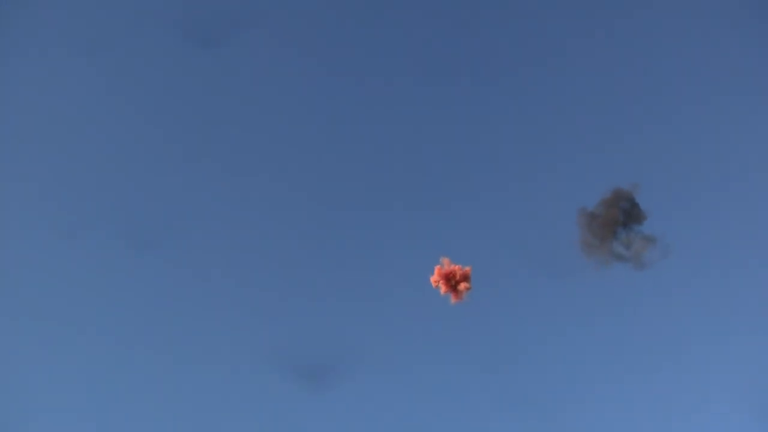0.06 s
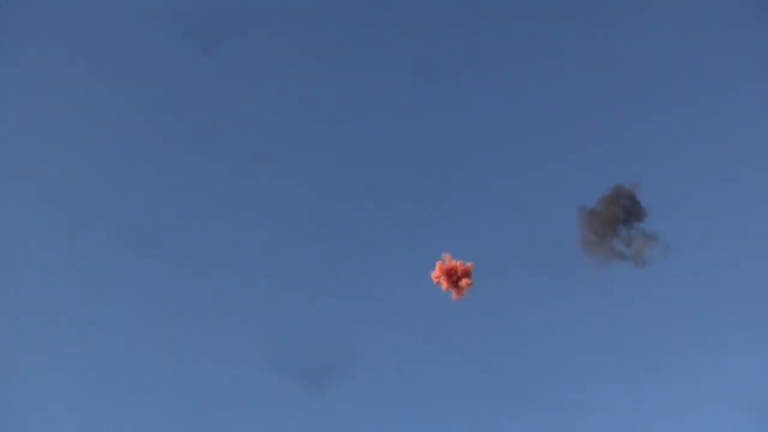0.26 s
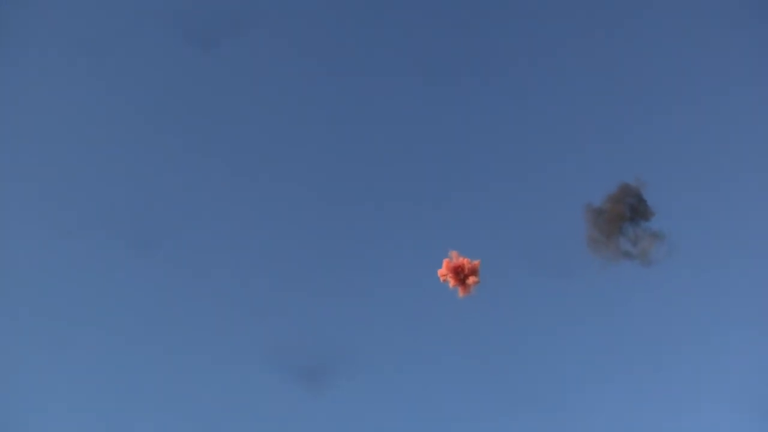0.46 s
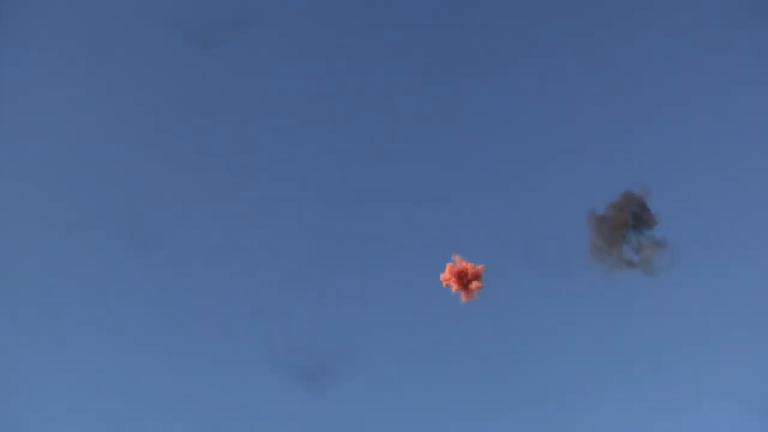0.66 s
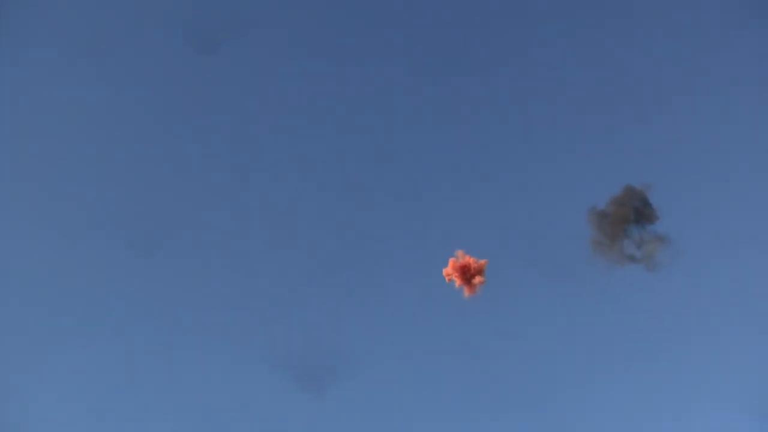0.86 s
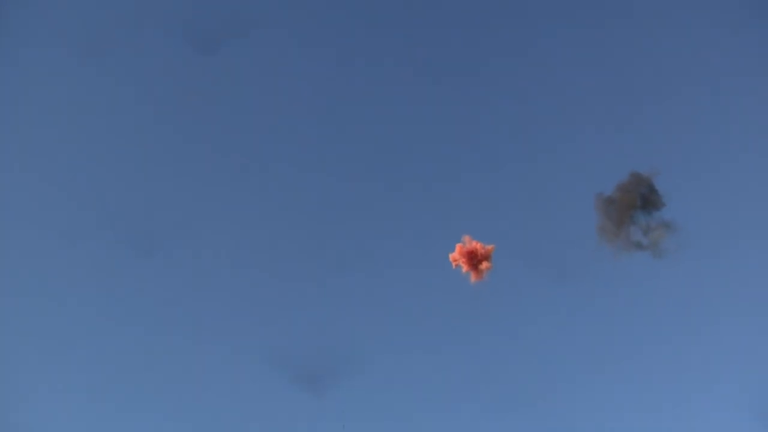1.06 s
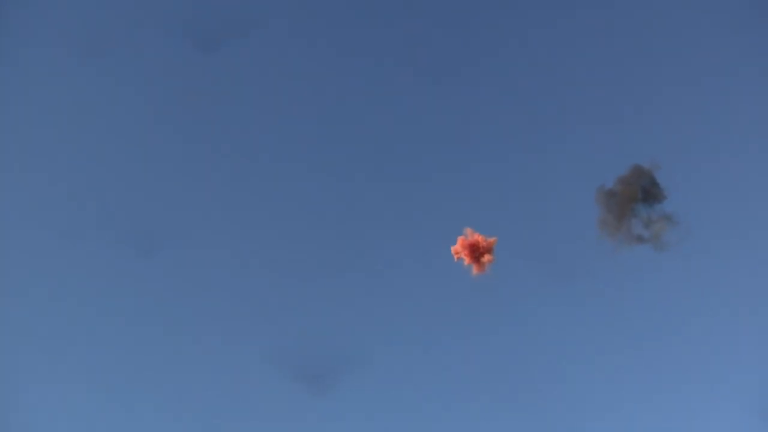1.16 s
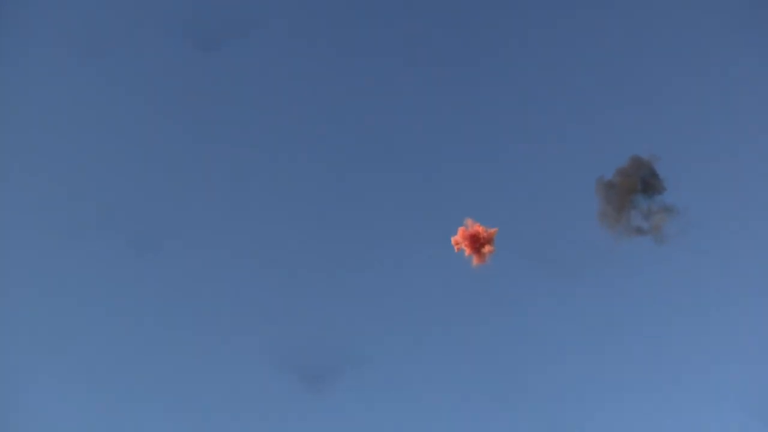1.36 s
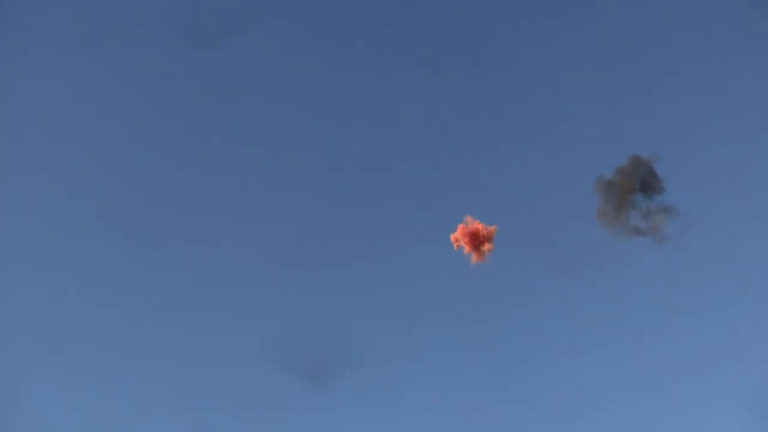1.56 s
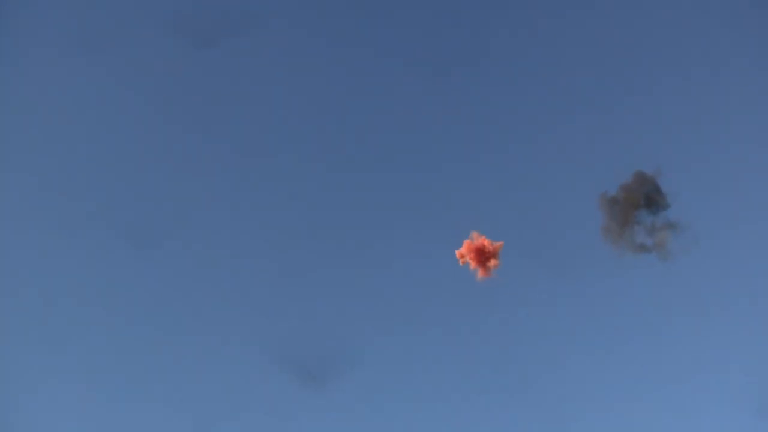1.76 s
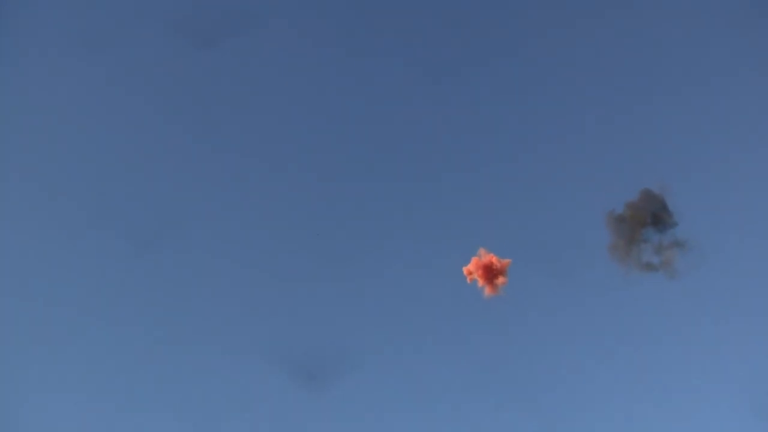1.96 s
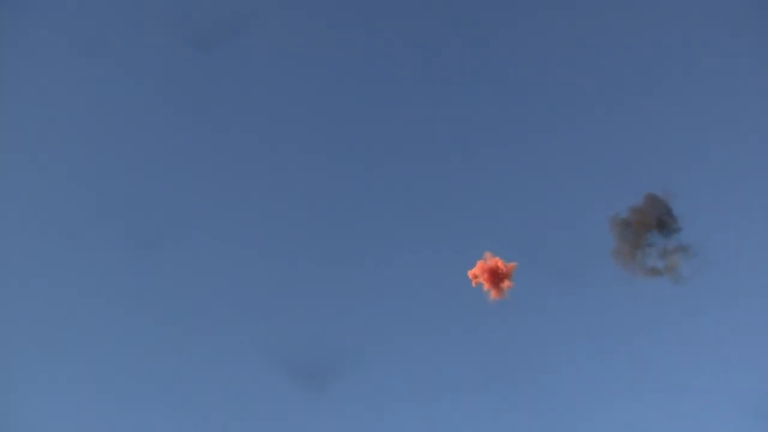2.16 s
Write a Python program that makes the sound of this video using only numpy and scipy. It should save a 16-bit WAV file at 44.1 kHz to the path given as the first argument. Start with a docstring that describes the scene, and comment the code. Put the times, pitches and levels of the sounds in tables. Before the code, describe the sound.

A firework shell bangs sharply overhead outdoors, its ragged echoes fading into a low rolling rumble

```python
"""Aerial shell burst with echoes

A firework shell bursts overhead: swarms of random fronts, sharp shocks, ringing cracks and a falling thump.
Its ragged bang returns in echoes from the ground and buildings, over a scattered tail and a low boom.
Fainter cracks and dull thuds of farther shells roll over a grainy rumble of filtered noise from the left.
Two tiny sine ticks and a faint hiss lie on top. Two close microphone ports make the stereo.
"""
import sys
import numpy as np
from scipy import signal
from scipy.fft import rfft, irfft, next_fast_len
from scipy.io import wavfile
from scipy.ndimage import uniform_filter1d

SR = 44100
rng = np.random.default_rng(int(sys.argv[2]) if len(sys.argv) > 2 else 0)


def gain_from_db(level_db):
    """Convert decibel levels to linear amplitude factors (20 dB per decade)."""
    decades = np.asarray(level_db, float) / 20
    return 10 ** decades


def unload_audio(sound):
    """Save the sound as a 16-bit wav file, at the path given as the first command line argument."""
    columns = np.transpose(np.atleast_2d(sound))
    # keep every value between -1 and 1, then stretch to whole-number steps
    steps = np.round(np.clip(columns, -1, 1) * 32767)
    wavfile.write(sys.argv[1], SR, steps.astype(np.int16))


N = 97020
T = np.arange(N) / SR


def level(x, db):
    """Scale to an rms level."""
    return x * gain_from_db(db) / np.sqrt(np.mean(x ** 2))


def colour(x, table, lag_s=0.):
    """Causal minimum-phase filter through (f/Hz, level/dB) points, with a small delay."""
    size = next_fast_len(N + 8192)
    f = np.arange(size // 2 + 1) * SR / size
    hz, db = np.array(table, float).T
    log_gain = np.interp(np.log(f + 1), np.log(hz), db) * np.log(10) / 20
    # folding the cepstrum onto positive time makes the response causal
    cepstrum = irfft(log_gain, size)
    cepstrum[1:size // 2] *= 2
    cepstrum[size // 2 + 1:] = 0
    response = np.exp(rfft(cepstrum) - 2j * np.pi * f * lag_s)
    return irfft(rfft(x, size) * response, size)[..., :N]


def dull(x, hz):
    """Second-order low-pass that takes the edge off."""
    return signal.lfilter(*signal.butter(2, hz, fs=SR), x)


def grains(rate, scatter_db):
    """Random small fronts of uneven size, rate per second."""
    hit = rng.random(N) < rate / SR
    return hit * rng.standard_normal(N) * gain_from_db(scatter_db * rng.random(N))


def fronts(table, smooth, damp):
    """Pressure jumps up, falls through zero and rings out; smooth is the onset's share of a cycle."""
    out = np.zeros(N)
    for start_s, db, cycle_ms in table:
        u = np.clip((T - start_s) / (cycle_ms / 1000), 0, 20)
        out += gain_from_db(db) * np.tanh(u / smooth) * np.cos(2 * np.pi * u) * np.exp(-damp * u ** 2)
    return out


def walk(rate):
    """Random levels held 1 / rate s and slewed twice."""
    hold = int(SR / rate)
    steps = np.repeat(rng.standard_normal(200), hold)
    return uniform_filter1d(uniform_filter1d(steps, hold), hold)[:N]


def surge(x):
    """Each low band swells and sinks on its own; the sound above them stays steady."""
    # upper edges of the swelling bands (f/Hz)
    band_edges = (113, 211, 302, 382, 550, 774)
    swells_per_s, swell_db = 8.82, 4  # dB per unit of the random walk
    lows = [0] + [dull(x, hz) for hz in band_edges]
    out = x - lows[-1]
    for below, above in zip(lows, lows[1:]):
        out = out + gain_from_db(swell_db * walk(swells_per_s)) * (above - below)
    return out


def rumble():
    """Countless far echoes: dull grains over a smooth wash from the left, and a diffuse part in each port."""
    # how the rumble rolls (t/s, level/dB)
    roll_points = [(0, -47), (.15, -43.5), (.43, -43), (.62, -40.5), (.76, -45), (.87, -42.5), (1.01, -47),
                   (1.23, -47), (1.55, -45), (1.62, -48), (1.901, -46), (2.07, -48), (2.14, -50)]
    # spectrum of the rumble (f/Hz, level/dB)
    rumble_tone = [(15, -49), (28, -17), (80, -3.5), (118, -12.5), (170, -1), (215, -7), (330, -5),
                   (430, -4.5), (620, -7.5), (900, -10), (1500, -16), (2500, -23.5), (4000, -37),
                   (7000, -53.5), (12000, -62)]
    grains_per_s, scatter_db, grains_below_hz = 900, 9, 680
    wash_db, diffuse_db = -4, -7
    s, db = np.array(roll_points).T
    roll = gain_from_db(np.interp(T, s, db))
    lumps = dull(level(grains(grains_per_s, scatter_db), 0), grains_below_hz)
    smooth_wash = gain_from_db(wash_db) * rng.standard_normal(N)
    left = level(colour(surge(lumps + smooth_wash), rumble_tone), 0)
    diffuse = level(colour(rng.standard_normal((2, N)), rumble_tone), diffuse_db)
    return roll * left, roll * diffuse


def hiss():
    """Faint white noise, independent in each port."""
    return gain_from_db(-80) * rng.standard_normal((2, N))


def decay(after, db, t60_s):
    """Exponential fade that starts at its full level when after passes zero."""
    return (after > 0) * gain_from_db(db - 60 * np.abs(after) / t60_s)


def bursts():
    """Swarms of fronts swell, peak and die; a scattered tail and a low boom follow the bang."""
    # the bang, its echoes and far cracks (peak t/s, level/dB, rise/ms, fall time constant/ms, treble/dB)
    swells = [(0.255, -10, 20.7, 6.2, -7.5), (.283, -15.5, 21.6, 16.4, -7), (.325, -28.5, 64, 25, -7),
              (0.355, -28, 59, 17.5, -1), (0.382, -47.5, 56, 7.4, 10.5), (.447, -47.5, 17, 15, 8.5),
              (0.467, -34, 22, 38.6, -4), (.6, -48, 34, 12, -8), (.655, -53.5, 10, 13, 4),
              (.87, -56, 10, 180, -7), (1.049, -47, 29, 31, -7.5), (1.1, -50, 56, 92, -9.5),
              (1.201, -52, 31, 24, -7.5), (1.263, -36.5, 22.5, 6.3, -7.5), (1.283, -44.5, 11, 13, -12),
              (1.314, -41, 18, 21.4, -13.5), (1.423, -48.5, 75, 18, -14), (1.466, -49.5, 14, 12, -16),
              (1.487, -52.5, 20, 11, -11.5), (.004, -48.5, 11, 32, -8.5)]
    # spectrum of the swarm (f/Hz, level/dB)
    swarm_tone = [(90, -12), (150, -5.5), (300, -8.5), (550, -5.5), (900, -5.5), (1450, -6.5), (2200, -7),
                  (3200, -9), (5000, -11.5), (8000, -19.5), (10500, -28.5), (13000, -39.5), (16000, -48.5)]
    grains_per_s, scatter_db, treble_from_hz = 11000, 4, 2500
    tail_db, tail_t60_s, tail_treble_db = -40, 1.09, 2.5
    boom_db, boom_t60_s, boom_hz = -28, 0.2, 140

    pair = np.array([grains(grains_per_s, scatter_db) for _ in range(2)])
    swarm = level(colour(pair, swarm_tone), 0)
    low = dull(swarm, treble_from_hz)
    after = T - swells[0][0]  # time since the bang's peak
    tail = decay(after, tail_db, tail_t60_s)
    # body and treble follow separate power envelopes
    power = tail ** 2
    treble_power = (tail * gain_from_db(tail_treble_db)) ** 2
    for peak_s, db, rise_ms, fall_ms, treble_db in swells:
        d = (T - peak_s) * 1000
        rise = np.cos(np.pi / 2 * np.clip(d / rise_ms, -1, 0)) ** 2
        shape = np.where(d < 0, rise, np.exp(-np.abs(d) / fall_ms))
        power += (gain_from_db(db) * shape) ** 2
        treble_power += (gain_from_db(db + treble_db) * shape) ** 2
    low_noise = dull(dull(rng.standard_normal((2, N)), boom_hz), boom_hz)
    boom = level(low_noise, 0) * decay(after, boom_db, boom_t60_s)
    return np.sqrt(power) * low + np.sqrt(treble_power) * (swarm - low) + boom


def cracks():
    """A few cycles that swell to the peak and die as fast."""
    # ringing cracks (peak t/s, level/dB, f/Hz, ring/ms)
    rings = [(.1539, -36, 1000, .7), (.2496, -12, 1450, 1.6), (.2555, -8, 1400, 2.2),
             (1.2558, -39, 900, 1.5), (1.2606, -31, 960, 1.0), (1.3153, -30.5, 1300, .75)]
    out = np.zeros(N)
    for peak_s, db, hz, ms in rings:
        d = T - peak_s
        out += gain_from_db(db) * np.cos(2 * np.pi * hz * d) * np.exp(-(d * 1000 / ms) ** 2)
    return out


def thuds():
    """Dull pressure fronts from the left that ring out slowly."""
    # thuds of farther shells (start t/s, level/dB, cycle/ms)
    thud_hits = [(.458, -33.5, 10), (.529, -33.5, 14), (.545, -31.5, 14), (.559, -37, 9.5),
                 (.577, -25.5, 3.3), (1.187, -30.5, 3.6), (1.224, -29.5, 3.4), (1.333, -29.5, 3.6),
                 (1.345, -37.5, 4.4), (1.398, -32, 2.8), (1.405, -32, 2.7), (1.565, -41, 3.1),
                 (1.684, -45, 1.3), (1.697, -33.5, 2), (1.855, -33, 2.66), (1.877, -35.5, 3.9),
                 (1.905, -35.5, 4.9), (1.933, -34.5, 4.1), (1.955, -38.5, 3.5), (2.032, -37.5, 3.3),
                 (.208, -30.5, 2.6)]
    return fronts(thud_hits, smooth=0.15, damp=0.69)


def shocks():
    """Single shock fronts overhead, damped within about a cycle."""
    # shock fronts (start t/s, level/dB, cycle/ms)
    shock_hits = [(.2354, -24, 1.8), (.2473, -9, .8), (.2586, -11, 1.0), (1.2605, -30, .5),
                  (.2536, 1.5, 2.1), (.2554, -8, 1.6)]
    return fronts(shock_hits, smooth=.15, damp=1.8)


def thump():
    """The burst's pressure thump: a decaying low sine that falls in pitch."""
    start_s, start_db, t60_s = .252, -8.5, 0.075
    start_hz, end_hz, glide_s = 205, 50, 0.0073
    u = np.maximum(T - start_s, 0)
    hz = end_hz + (start_hz - end_hz) * np.exp(-u / glide_s)
    phase = 2 * np.pi * np.cumsum(hz * (u > 0)) / SR
    return gain_from_db(start_db - 60 * u / t60_s) * np.sin(phase)


def ticks():
    """Tiny bright sine pips that die in a fraction of a millisecond."""
    # faint high ticks (start t/s, level/dB)
    pips = [(1.752, -51), (1.84, -51)]
    tick_hz, fall_s = 8240, 0.00018
    out = np.zeros(N)
    for start_s, db in pips:
        u = np.maximum(T - start_s, 0)
        out += gain_from_db(db) * np.sin(2 * np.pi * tick_hz * u) * np.exp(-u / fall_s)
    return out


def scene():
    """Overhead sound reaches the left port a little first; sound from the left is shadowed on the right."""
    # part of the overhead swarm that differs between the ports (f/Hz, level/dB)
    unlike = [(100, 0), (500, -23), (2000, -32), (6000, -15), (13000, 1)]
    # shadow on the right port for sound from the left (f/Hz, level/dB)
    shadow = [(40, 0), (110, -1), (200, -6), (400, -7), (800, -8.5), (2400, -10), (6000, -8)]
    right_db, above_lag_s, left_lag_s = -.5, 4e-5, 3e-5
    far_left, diffuse = rumble()
    swarm, other_swarm = bursts()
    above = swarm + cracks() + shocks() + thump() + ticks()
    from_left = far_left + thuds()
    above_right = above + colour(other_swarm, unlike)
    right = colour(above_right, [(20, right_db), (20000, right_db)], above_lag_s)
    right = right + colour(from_left, shadow, left_lag_s)
    return np.array([above + from_left, right]) + diffuse + hiss()


def band_limit(x):
    """A steep low-pass at the top of the band."""
    return signal.sosfilt(signal.butter(12, 16410, fs=SR, output="sos"), x)


def record(dry):
    """Soft saturation lifts the mix and rounds its loudest peaks; a steep low-pass cuts the top."""
    rounded = np.tanh(0.78 * dry) / np.tanh(.7)
    top_cut = signal.ellip(8, .2, 70, 15800, fs=SR, output="sos")  # ripple dB, stop dB, edge Hz
    return band_limit(signal.sosfilt(top_cut, rounded))


dry = scene()
out = record(dry)
unload_audio(out)
```